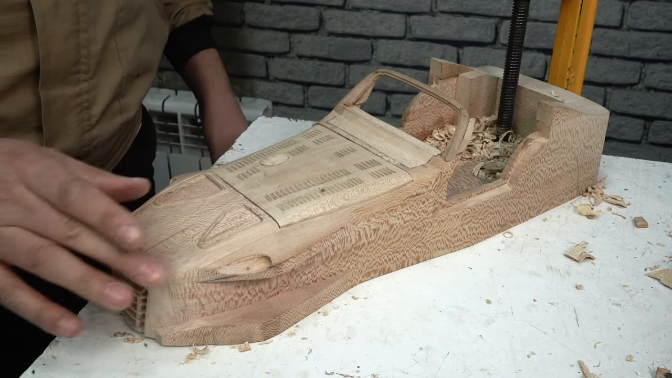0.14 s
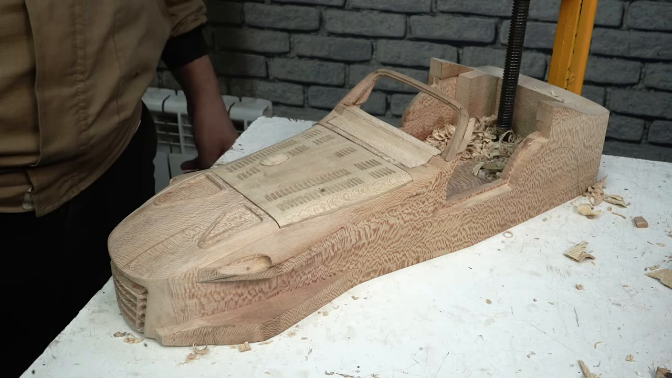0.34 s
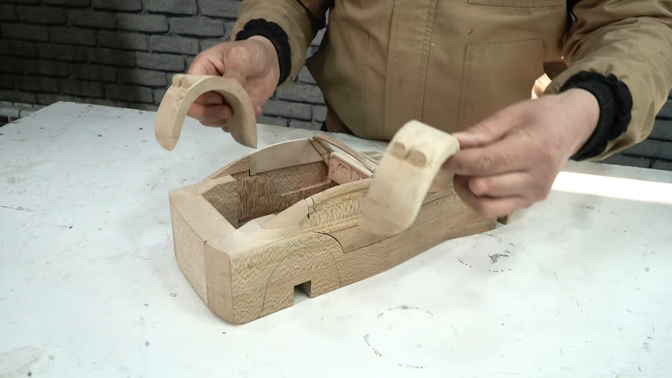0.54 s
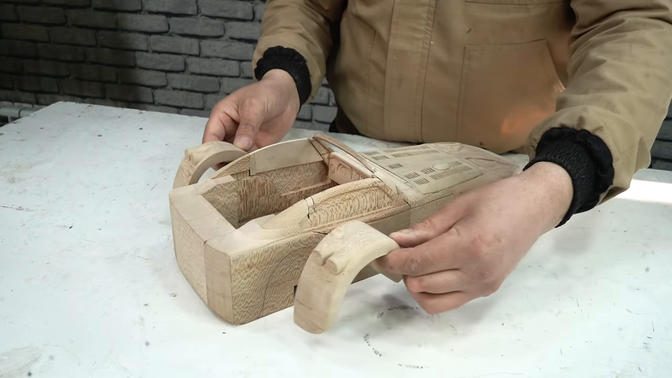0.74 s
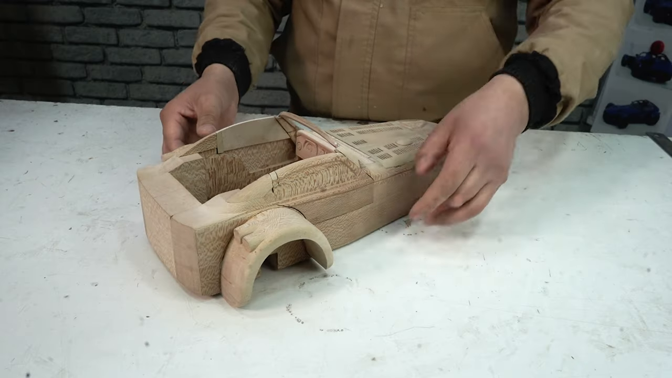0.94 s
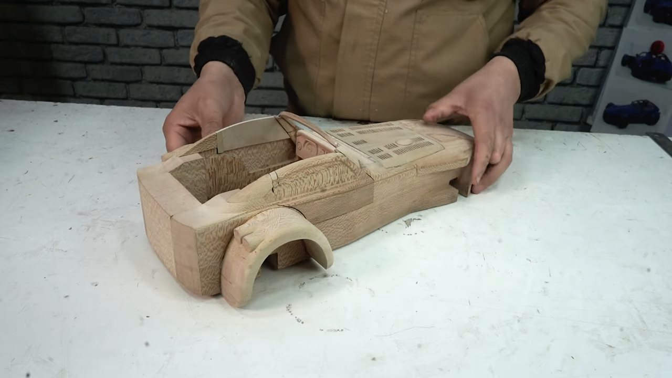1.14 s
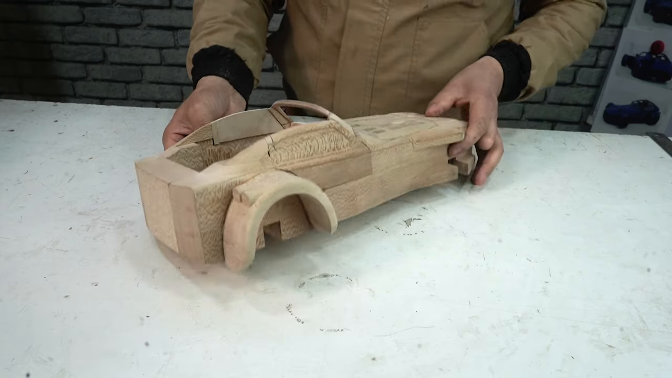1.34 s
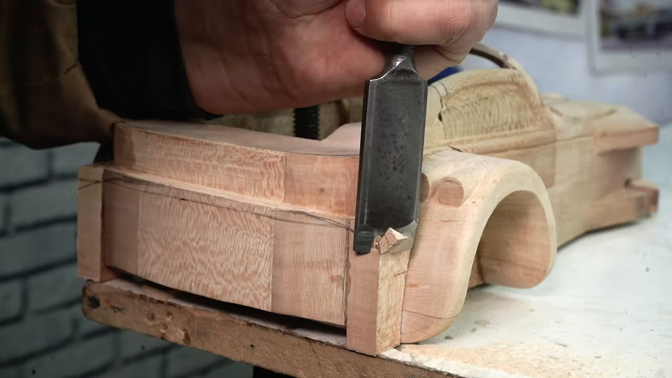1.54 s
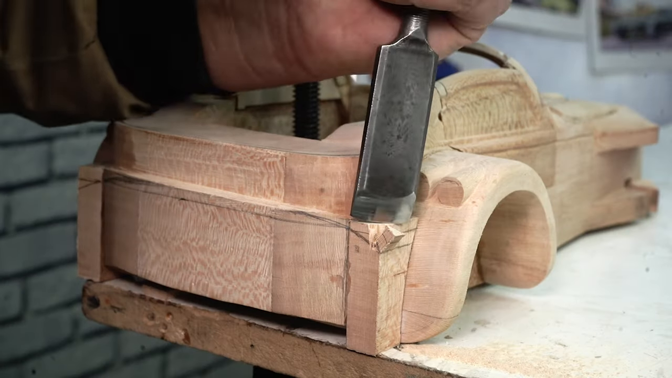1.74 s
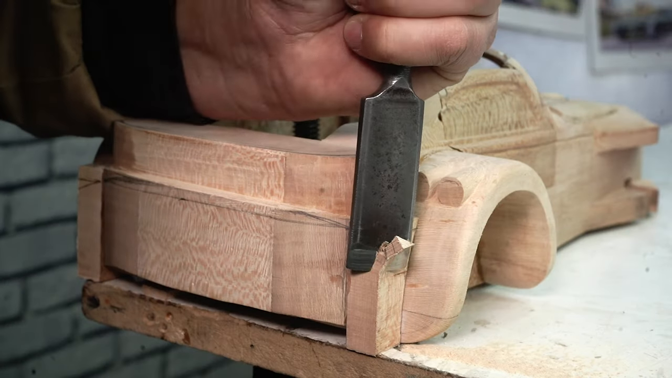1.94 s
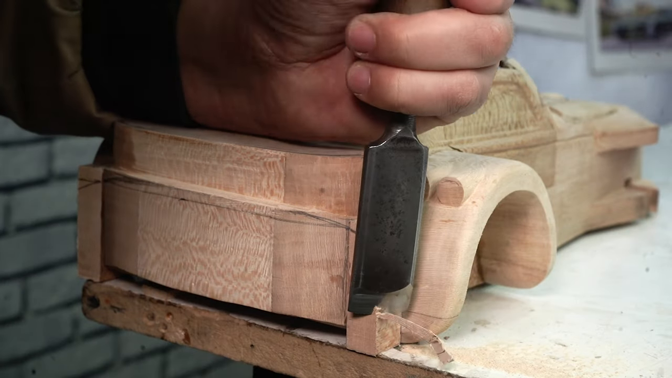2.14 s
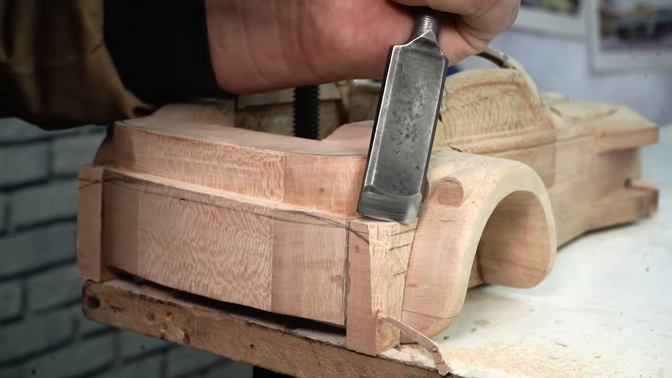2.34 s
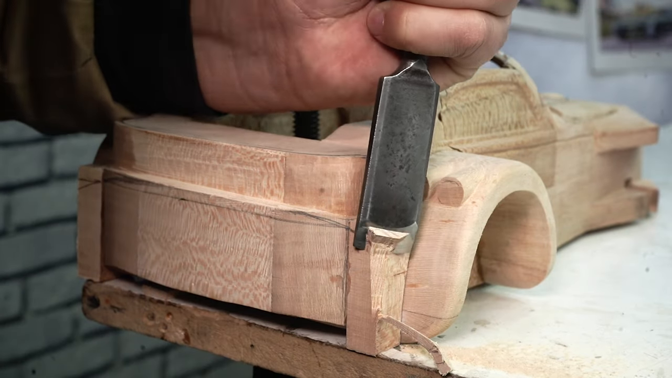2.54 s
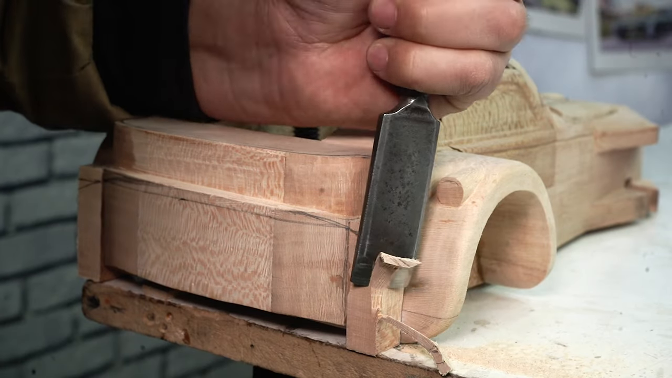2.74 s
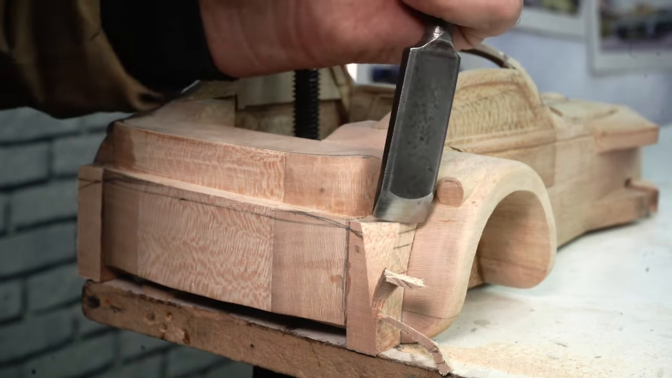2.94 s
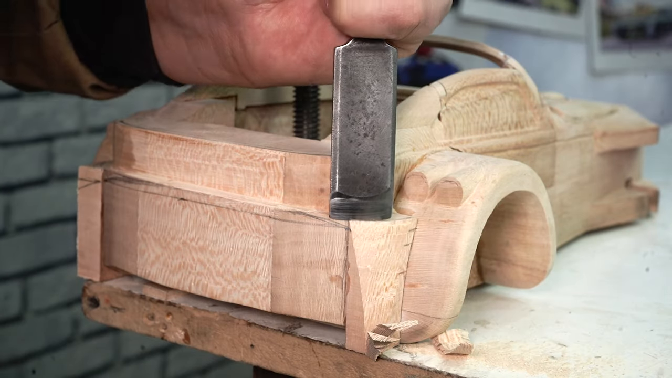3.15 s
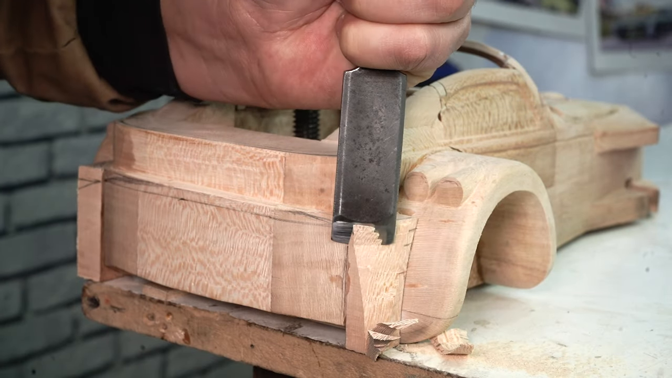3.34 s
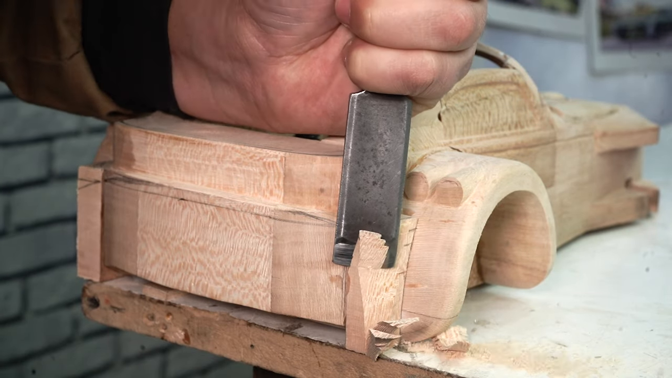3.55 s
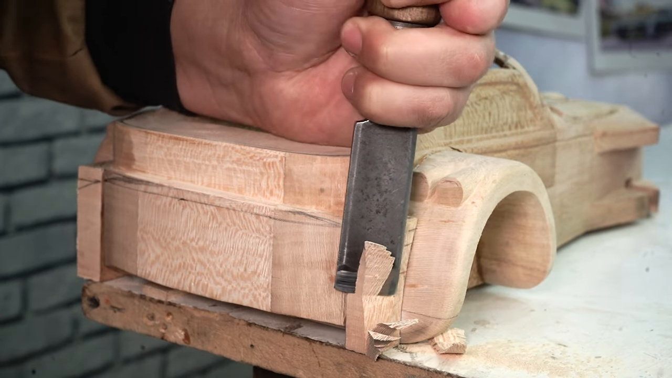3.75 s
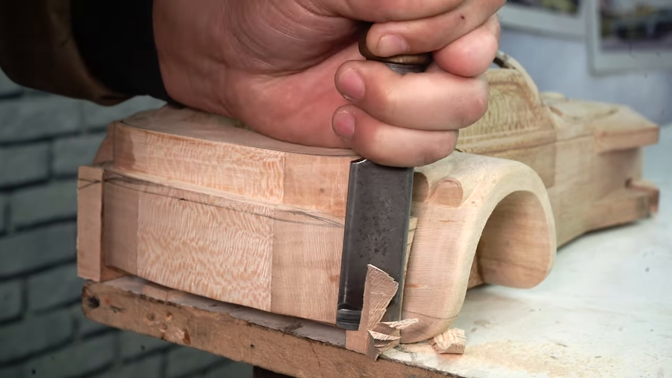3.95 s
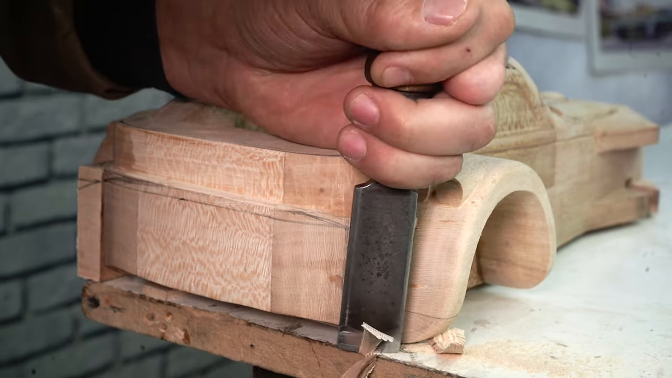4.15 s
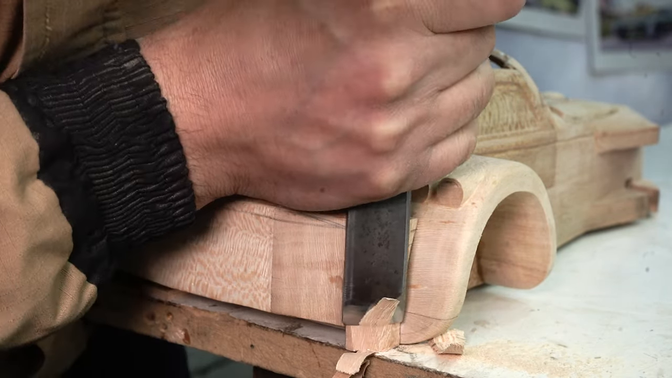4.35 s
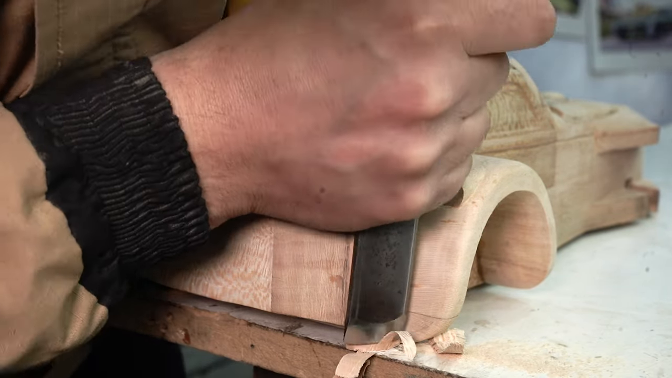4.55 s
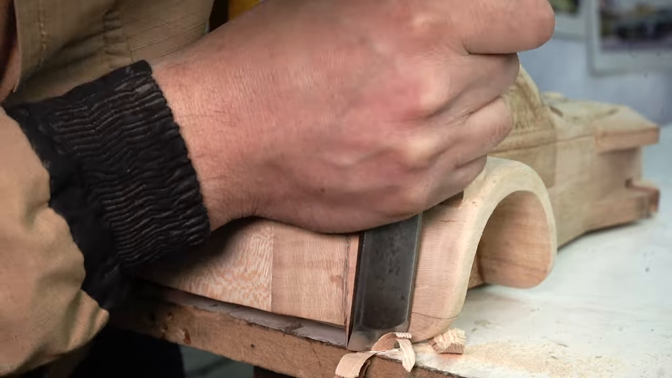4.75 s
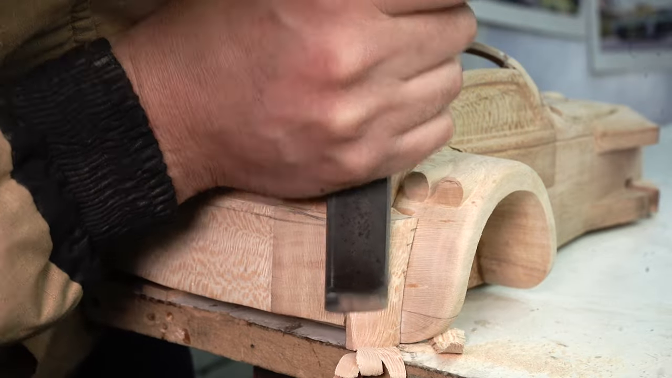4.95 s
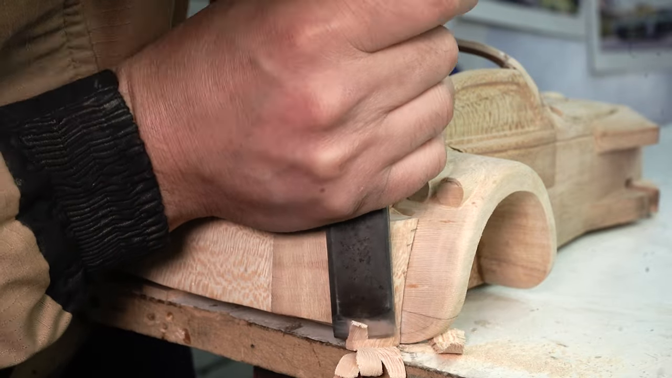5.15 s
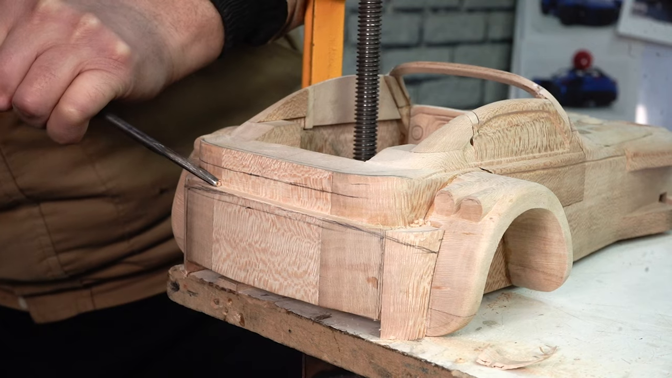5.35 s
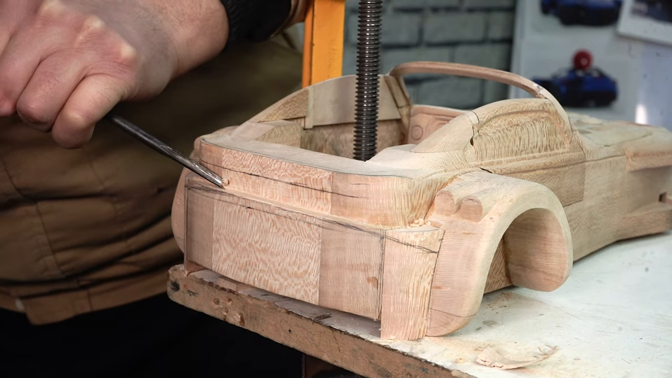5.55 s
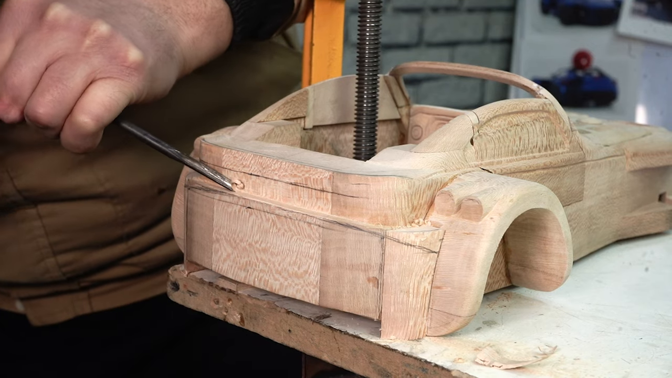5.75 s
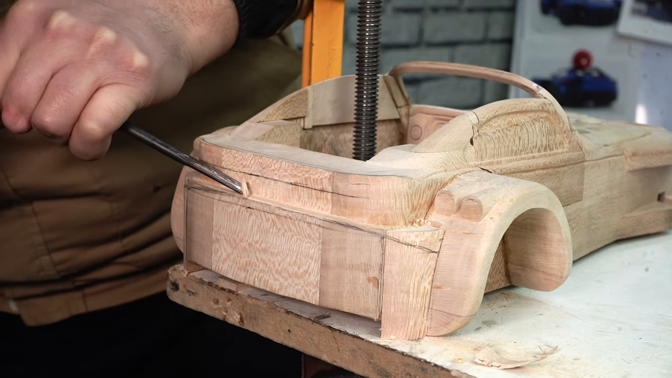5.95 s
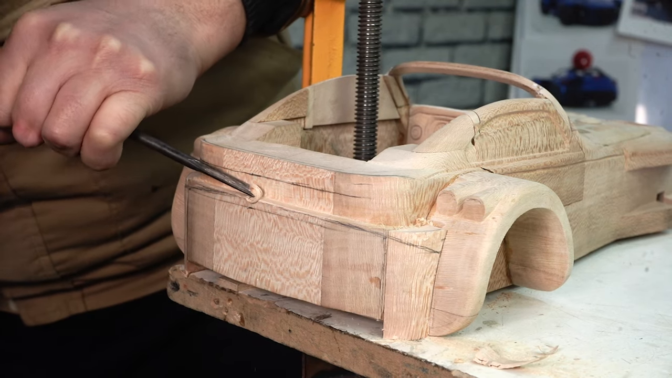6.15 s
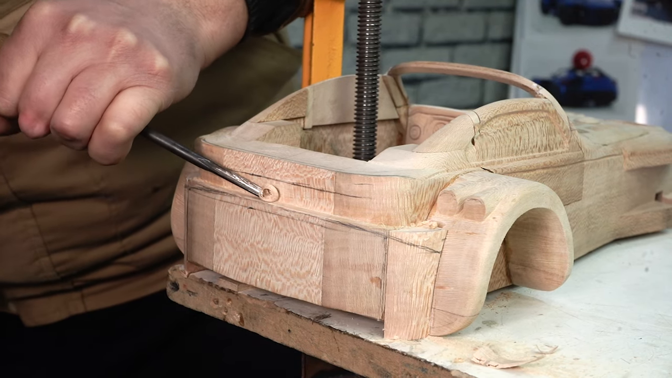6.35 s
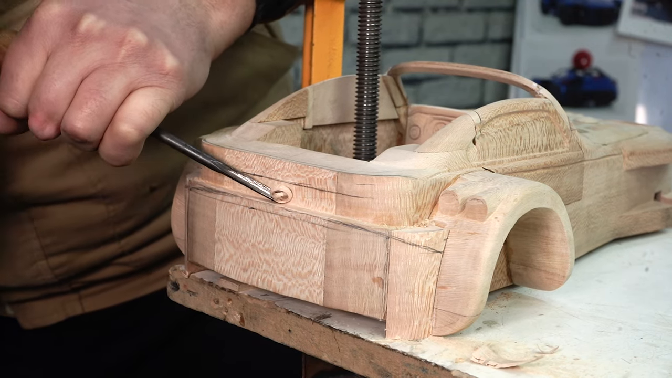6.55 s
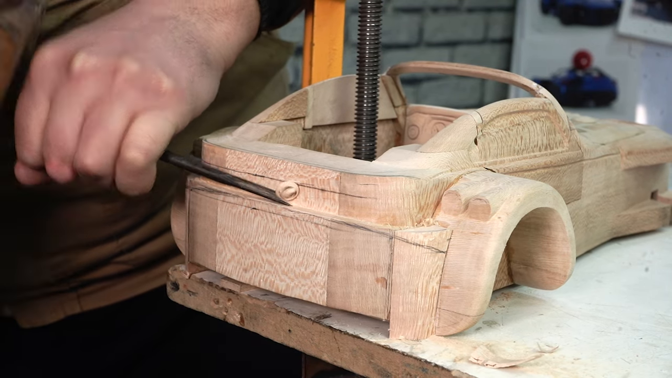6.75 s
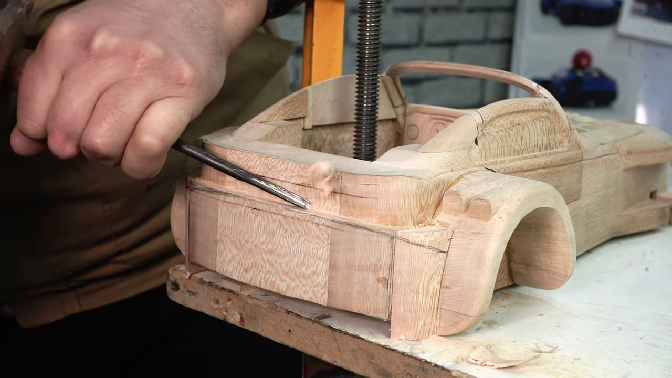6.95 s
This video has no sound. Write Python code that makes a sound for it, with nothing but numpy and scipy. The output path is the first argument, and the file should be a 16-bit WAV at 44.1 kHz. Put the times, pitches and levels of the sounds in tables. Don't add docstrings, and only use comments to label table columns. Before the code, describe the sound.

Rapid mallet taps drive a flat chisel and then a small gouge into wood, with scraping hand cuts between, close in a small workshop.

```python
import sys
import numpy as np
from scipy import signal
from scipy.io import wavfile
from scipy.ndimage import uniform_filter1d

SR = 44100
rng = np.random.default_rng(int(sys.argv[2]) if len(sys.argv) > 2 else 0)


def natural_amplitude(level_db):
    exponent = np.asarray(level_db, float) / 20
    return 10 ** exponent


def inscribe(sig):
    pcm = np.round(np.clip(np.atleast_2d(sig).T, -1, 1) * 32767)
    wavfile.write(sys.argv[1], SR, pcm.astype(np.int16))


N = 308259
T = np.arange(N) / SR
BENCH_S, CARVING_S, GOUGE_S = .5478, 1.4835, 5.292

# frequency in Hz, level in dB per Hz.
BUILDING = [(20, -7), (45, 4), (100, 9.5), (170, -35.5), (260, -52)]
# frequency in Hz, level in dB per Hz.
QUIET_SHOP = [(88, -22), (150, -32), (220, 7), (389, -17), (562, -3), (700, -41), (841, -13), (1380, -20),
              (3150, -30.5), (12000, -37.5), (15600, -92.5), (22000, -120)]
# frequency in Hz, level in dB per Hz.
IDLE_HISS = [(20, 14), (200, 0), (1000, -4), (16000, -8)]
# frequency in Hz, t60 in seconds.
ROOM_T60 = [(200, 0.16), (500, 0.69), (1000, 0.31), (2800, 0.26), (7000, 0.2), (15000, 0.13)]
# delays in seconds, then their levels in dB.
WALL_DELAYS = [0.017, 0.024]
WALL_LEVELS = [-15.5, -18.5]

# time in seconds, level in dB.
HUM_LEVELS = [
    (0.0, -36),
    (0.09, -34),
    (0.372, -33),
    (0.466, -37),
    (0.548, -44),
]
# frequency in Hz, level in dB per Hz.
WHIR_COLOUR = [(180, -43), (300, -25.5), (478, -29), (796, -5), (906, -9), (1190, -12.5), (1400, -38),
               (1940, -28.5), (4000, -67), (5200, -54), (8800, -120)]
# frequency in Hz, level in dB per Hz.
HISS_COLOUR = [(880, -30), (1500, -2), (5200, -12), (6110, -12), (12600, -13.5), (15700, -20), (16500, -38)]
# frequency in Hz, level in dB per Hz.
DRONE_COLOUR = [(76, -9), (130, -3), (303, -15.5), (330, -9), (360, -19), (612, -8), (940, -25),
                (1130, -25), (4000, -53), (5200, -70), (8800, -120)]
# frequency in Hz, level in dB per Hz.
SHAKE_COLOUR = [(15, -22), (35, 9), (60, 4), (100, -2), (160, -27), (240, -35.5)]
TICK_LEVELS = [-59, -60, -61, -59, -54]

# time in seconds, rumble in dB, air in dB.
BENCH_LEVELS = [(0.55, -52, -61), (0.78, -50, -60), (0.994, -48, -60.5), (1.196, -45, -55.5),
                (1.298, -51, -56.5), (1.48, -47, -56)]
# frequency in Hz, level in dB per Hz.
RUMBLE_COLOUR = [(12, -41), (20, -14.5), (93, -3), (225, -20), (275, -18.5), (380, -20.5), (545, -28),
                 (619, -45), (857, -39), (1500, -52), (1950, -71), (3300, -120)]
# frequency in Hz, level in dB per Hz.
AIR_COLOUR = [(290, -57), (500, -7.5), (623, -8), (859, -11), (4550, -21), (6100, -24), (15100, -24.5),
              (16500, -30)]
# start in seconds, level in dB, length in seconds.
WOOD_DRAGS = [
    (.9525, -47, 0.0125),
    (.974, -50, 0.011),
]
# time in seconds, level in dB.
CATCHES = [(.9526, -33), (.9543, -40), (.9562, -35), (.9583, -38), (.96, -38), (.9625, -41), (.9743, -34),
           (.9758, -35), (.9782, -36), (.9815, -32)]
# frequency in Hz, level in dB per Hz.
DRAG_COLOUR = [(180, -29), (300, -12), (508, -9.5), (927, -11.5), (1650, -17), (2500, -18.5), (4280, -36),
               (7800, -70)]
# frequency in Hz, width in Hz, lift in dB.
DRAG_HUMPS = [(496, 50, 6.5), (695, 37, 3), (824, 30, 3.5), (1180, 54, 3), (1380, 87, 7), (2004, 110, 12)]
# start in seconds, level in dB, length in seconds.
SLEEVE = [
    (1.125, -52.5, 0.029),
    (1.17, -54, 0.025),
    (1.252, -48.5, 0.013),
    (1.31, -62, 0.027),
]
# frequency in Hz, level in dB per Hz.
CLOTH = [(3000, -40), (6000, -15), (16000, -11.5)]
# frequency in Hz, width in Hz, level in dB.
CLOTH_HUMPS = [(6750, 500, 2), (8860, 740, 2), (10700, 500, 1), (13200, 1300, 5), (15200, 900, -5)]
# time in seconds, level in dB.
HOLLOW_KNOCKS = [
    (1.229, -25),
    (1.46, -46),
]
# frequency in Hz, level in dB, t60 in seconds.
HOLLOW_MODES = [(179.3, -11, 0.32), (214, -9, 0.36), (314, -0.5, 0.32), (520, 1, 0.052), (573, -24, 0.083),
                (679, -3, 0.036), (994, -5.5, 0.03), (1260, 11.5, 0.0071)]
# time in seconds, level in dB.
ROCKINGS = [
    (1.256, -30),
    (1.302, -42),
    (1.353, -48),
    (1.398, -45),
    (1.431, -56),
]
# frequency in Hz, level in dB, t60 in seconds.
ROCK_MODES = [(239, -12, 0.26), (318, -10.5, 0.14), (441, -0.5, 0.094), (594, -13.5, .12), (838, -20, .08)]

# start in seconds, level in dB, frequency in Hz,
# t60 in seconds.
SMALL_CONTACTS = [(1.116, -44, 850, .012), (1.843, -44, 3100, .06), (1.847, -53, 4400, .05),
                  (1.852, -54, 1070, 0.27), (3.069, -54, 2500, .08), (3.071, -58, 1070, 0.16),
                  (3.121, -61, 3130, .15), (3.08, -66, 543, 0.21), (3.216, -33, 1460, 0.035),
                  (3.219, -40, 550, 0.092), (1.712, -53, 2650, 0.027), (4.307, -40.5, 2900, .04),
                  (4.306, -40, 3200, 0.037), (4.381, -45, 1300, .035), (4.38, -41, 3100, .03),
                  (4.558, -43, 1465, .12), (6.7, -43, 5200, .05), (5.9, -47, 5000, .12),
                  (4.578, -40, 5850, .06), (3.9, -39, 3000, .08), (4.949, -33, 5300, .05),
                  (5.078, -50, 3330, .15), (5.115, -53, 2600, .12), (1.602, -27.5, 2090, .15),
                  (1.618, -28, 2700, .08), (1.782, -59, 950, .3), (5.266, -46, 248, .1),
                  (4.575, -37.5, 1520, 0.043), (4.568, -36, 3200, .05), (4.585, -33, 2850, 0.044),
                  (4.722, -40, 1030, .04), (5.4, -42, 1200, .05), (4.722, -41, 3700, .04),
                  (4.876, -51, 1900, .04), (4.9, -48, 1510, .05), (4.904, -43, 4220, .04),
                  (4.917, -42, 2980, .04), (4.949, -39.5, 870, .05), (4.972, -38, 2900, .06),
                  (5.065, -51, 1500, .04), (5.09, -53, 1500, .03), (5.11, -50, 1300, .04),
                  (5.111, -41, 3420, .04), (5.13, -45, 2720, .08), (5.15, -43, 2950, .04),
                  (5.199, -38, 3250, .04), (3.635, -53.5, 87, 0.32), (3.635, -60, 128, .3),
                  (4.691, -53, 98, 0.22)]
# start in seconds, level in dB, length in seconds.
FAINT_BRUSHES = [
    (.27, -58.5, .12),
    (4.19, -72, 0.062),
    (4.243, -66, .016),
    (4.255, -71, 0.03),
]
# frequency in Hz, level in dB per Hz.
BRUSH_COLOUR = [(5000, -30), (9000, -4), (11500, 0), (15000, -4), (16500, -20)]

# time in seconds, level in dB.
LEANING = [(4.25, -85), (4.374, -58), (4.506, -59), (4.842, -66), (4.976, -58.5), (5.152, -57.5),
           (5.306, -59), (5.4, -63)]
# frequency in Hz, level in dB per Hz.
GROAN_COLOUR = [(60, -15), (110, -11.5), (180, -10.5), (205, 1), (222, 4), (240, -11), (264, 5.5),
                (300, -22), (500, -36)]
# time in seconds, level in dB.
SLIDE_LEVELS = [
    (4.3, -77),
    (4.498, -50),
    (4.604, -74),
    (5.032, -64),
    (5.25, -61),
]
# frequency in Hz, level in dB per Hz.
SHAVING_COLOUR = [(150, -12), (250, -3), (700, -3), (1500, -4), (3000, 0.5), (6000, -3.5), (14000, -7.5),
                  (16500, -9)]
# start in seconds, level in dB, rise in seconds,
# chip ring in dB.
HAND_PRODS = [(1.842, -46, 0.0063, -6), (3.068, -55, 0.0046, -6), (3.118, -64, 0.0044, 1),
              (4.303, -35, 0.0052, 2), (4.379, -44, 0.011, -2), (4.414, -30, 0.0024, -6),
              (4.556, -38, 0.015, 1.5), (4.676, -45.5, 0.015, -1), (4.716, -36.5, 0.0063, 2.5),
              (4.895, -42, 0.01, 0), (4.935, -32, 0.0068, 0.5), (5.076, -48.5, 0.011, -5),
              (5.104, -39.5, 0.0072, -3), (5.148, -41.5, 0.0043, -3), (5.194, -35.5, 0.0074, -8)]
# frequency in Hz, width in Hz, lift in dB.
CHIP_HUMPS = [(932, 220, 7.5), (1420, 260, 10), (2860, 560, 9), (3340, 260, 7), (4360, 260, 8),
              (5900, 340, 11)]

# time in seconds, steel click in dB, wood crunch in dB, low thud in dB.
HAND_THRUSTS = [
    (4.4183, -6.5, -32.5, -44.5),
    (4.7678, -36, -34, -53.5),
    (4.9472, -8.5, -39, -54.5),
    (5.2588, -16, -39, -46.5),
]
# frequency in Hz, level in dB per Hz.
THRUST_COLOUR = [(410, -22), (700, -19), (936, -4.5), (1510, -4.5), (2810, -0.5), (13700, -16),
                 (15900, -10), (16500, -43)]
# frequency in Hz, level in dB, t60 in seconds.
THRUST_MODES = [(189, -13, 0.28), (218.5, -7.5, 0.45), (258.5, 2, 0.36), (544, 1, .11), (863, -8.5, 0.2),
                (1016, 6, 0.044)]
# frequency in Hz, level in dB, t60 in seconds.
CRACK_MODES = [(2270, -4, 0.01), (3150, -2.5, 0.022), (3880, 11, 0.0039), (5040, 4, 0.0086),
               (6120, -5, 0.023)]
# time in seconds, level in dB.
SPLINTER_SNAPS = [
    (4.419, -12),
    (4.7677, -22),
    (4.948, -16),
]
# frequency in Hz, level in dB, t60 in seconds.
SPLINTER_MODES = [(12600, -1, .003), (13900, 1, 0.0047), (15300, -4, .003)]
# frequency in Hz, level in dB, t60 in seconds.
LAY_MODES = [(257, -1, 0.021), (1260, -3, 0.029), (1370, 4, 0.023), (2130, 1, 0.016), (3060, 0, .02)]

# frequency in Hz, level in dB per Hz.
FIZZ_COLOUR = [(2500, -37), (5000, 2), (8000, 2), (12000, -2), (16000, -9)]
# time in seconds, bite in dB.
SHORT_CUT_BLOWS = [(1.5057, -28), (1.5543, -25), (1.894, -25.5), (1.946, -25.5), (1.9917, -25),
                   (2.0378, -25.5), (2.0851, -26), (2.128, -27), (2.1729, -29), (2.2154, -30.5),
                   (2.4652, -26), (2.5299, -25.5), (2.582, -25.5), (2.6329, -26), (2.6835, -26.5),
                   (2.7323, -26.5), (2.7814, -28), (2.8291, -29), (2.8795, -30.5)]
# time in seconds, bite in dB.
LONG_CUT_BLOWS = [(3.2143, -31.5), (3.2702, -29.5), (3.3218, -27.5), (3.3758, -25), (3.4335, -25),
                  (3.491, -25.5), (3.5465, -25), (3.6014, -25), (3.6565, -26), (3.7125, -27), (3.7679, -28),
                  (3.8252, -28.5), (3.8791, -28.5), (3.9341, -29), (3.987, -29), (4.0369, -30),
                  (4.0864, -32), (4.1276, -32), (4.1668, -34.5)]
# time in seconds, steel click in dB, wood crunch in dB,
# low thud in dB.
GLANCING = [
    (1.4834, -38, -32.5, -49),
    (1.5982, -32, -25, -32.5),
    (1.8427, -31, -47.5, -62),
    (3.0682, -51.5, -55.5, -69),
]
# frequency in Hz, level in dB, t60 in seconds.
CHISEL_PING = [(3970, -4, 0.007), (5060, -6, 0.0053), (7550, -7, 0.0056), (9780, -5, 0.011),
               (11500, -12, 0.0063), (13300, -7.5, 0.0061), (14730, -7, .004)]
# frequency in Hz, level in dB, t60 in seconds.
SHORT_GRIP_MODES = [(5730, 2.5, 0.0083), (8300, -1, 0.0092), (9050, -5, .008)]
# frequency in Hz, level in dB, t60 in seconds.
LONG_GRIP_MODES = [(3320, -2.5, 0.012), (6420, -1, 0.009), (8400, -9.5, 0.027), (10660, -2, .006),
                   (12300, 0, .004), (13200, 1, .004), (15400, -3.5, .004)]
# frequency in Hz, level in dB, t60 in seconds.
SWELL_MODES = [(1696, -4.5, 0.037), (2130, -3, 0.13), (2520, 2, 0.062), (2710, 6.5, 0.092)]
# frequency in Hz, level in dB per Hz.
CHISEL_CRUNCH = [(590, -13.5), (1000, -10), (1510, -8.5), (1640, -8), (1880, -7), (2770, -2.5), (3190, -5),
                 (8460, -12.5), (15200, -25.5), (16500, -11.5)]
# frequency in Hz, width in Hz, lift in dB.
CHISEL_HUMPS = [(1664, 34, 6), (2080, 65, 4), (2129, 54, 3), (2450, 16, 5.5), (2710, 23, 4), (2750, 34, 0),
                (3120, 40, 0), (3440, 63, -2), (5850, 80, 2.5), (8400, 90, 5), (7200, 900, -3),
                (10600, 90, 3.5)]
# frequency in Hz, level in dB, t60 in seconds.
CHISEL_THUD = [(264.5, -6.5, 0.39), (319.6, -9.5, 0.23), (569.5, 3, 0.092), (843, 5.5, 0.06),
               (973, -3.5, 0.11), (1314, -20, 0.099)]

# time in seconds, steel click in dB, bite in dB.
GOUGE_CUT = [(5.3039, -24, -31.5), (5.3509, -21, -33.5), (5.402, -22.5, -36), (5.4528, -20.5, -35.5),
             (5.5001, -22.5, -35), (5.5492, -20.5, -33), (5.598, -21, -32.5), (5.649, -23.5, -29.5),
             (5.6971, -21, -30.5), (5.7482, -21.5, -33), (5.799, -22.5, -34.5), (5.8461, -21, -33),
             (5.8948, -21, -33.5), (5.9433, -21.5, -30.5), (5.9898, -20, -32), (6.038, -21.5, -31),
             (6.0866, -22, -29), (6.1345, -21, -29), (6.1833, -21.5, -30.5), (6.2327, -23, -30),
             (6.2803, -23, -28.5), (6.3273, -23, -31.5), (6.3749, -21, -34), (6.4222, -20.5, -32.5),
             (6.4696, -21, -30.5), (6.5175, -20.5, -31.5), (6.5659, -21.5, -28.5), (6.6124, -21.5, -27.5),
             (6.6611, -22.5, -27), (6.7077, -22.5, -28), (6.756, -22.5, -28), (6.8069, -26, -30),
             (6.8573, -27, -30), (6.903, -25, -28.5), (6.9505, -24.5, -33.5)]
# frequency in Hz, level in dB, t60 in seconds.
GOUGE_PING = [(2443, -11.5, 0.02), (4300, -2.5, 0.0058), (4580, -6, 0.0098), (5090, -1, 0.0068),
              (5470, 3.5, 0.0068), (7980, -5.5, .012), (8300, -8.5, .01), (9180, -8.5, 0.015),
              (10470, -13, 0.017), (11300, -8.5, 0.007), (12900, -12, .006), (15100, -16.5, 0.0075)]
# frequency in Hz, level in dB, t60 in seconds.
SHANK_MODES = [(5787, 2, 0.013), (5680, -8, 0.008)]
# frequency in Hz, level in dB per Hz.
GOUGE_CRUNCH = [(420, -7), (700, -1.5), (1300, 1.5), (1800, 0.5), (2500, 2), (4000, 0), (6000, -0.5),
                (9000, -2.5), (14800, -11.5), (16500, -22)]
# frequency in Hz, width in Hz, lift in dB.
GOUGE_HUMPS = [(850, 52, 3.5), (980, 40, 6.5), (1090, 60, 3.5), (1205, 60, 3.5), (1550, 240, 1.5),
               (2610, 420, 1.5), (3540, 230, 2.5), (6000, 180, 1.5), (6950, 1060, -3.5)]
# frequency in Hz, level in dB, t60 in seconds.
GOUGE_THUD = [(265.1, -13, 0.37), (345, -7.5, 0.07), (550, 3.5, 0.035), (973, -1.5, 0.077),
              (1085, -3.5, 0.066)]
# frequency in Hz, level in dB, t60 in seconds.
BOOM_MODES = [(875, -1, 0.034), (850, -6, 0.21)]
# frequency in Hz, level in dB, t60 in seconds.
GROOVE_MODES = [(1081.5, -4, 0.053), (1150, -9, 0.13), (1200, 0, 0.034)]


def evened(x):
    return x / np.sqrt(np.mean(x ** 2) + 1e-20)


def read(points, hz):
    f, value = np.transpose(points)
    return np.interp(np.log(hz + 1), np.log(f + 1), value)


def curve_db(rows, column):
    return np.interp(T, [r[0] for r in rows], [r[column] for r in rows])


def colour(spectrum, humps=(), size=4096):
    hz = abs(np.fft.fftfreq(size, 1 / SR))
    level_db = read(spectrum, hz) + sum(db / (1 + (2 * (hz - f) / w) ** 2) for f, w, db in humps)
    log_gain = np.log(natural_amplitude(np.maximum(level_db - level_db.max(), -100)))
    response = np.exp(log_gain - 1j * signal.hilbert(log_gain).imag)
    taps = np.fft.ifft(response).real[:size // 2]
    return taps / np.linalg.norm(taps)


def through(x, taps):
    return signal.oaconvolve(x, taps)[:N]


def noise(spectrum):
    return through(rng.standard_normal(N), colour(spectrum))


def ring(modes, rise_s, size=SR // 3):
    t = np.arange(size) / SR
    x = sum(natural_amplitude(db - 60 * t / max(t60, .002)) * np.sin(2 * np.pi * hz * t) for hz, db, t60 in modes)
    x = x * (1 - np.exp(-t / rise_s))
    return x / abs(x).max()


def train(times, levels_db):
    x = np.zeros(N)
    x[np.round(np.asarray(times) * SR).astype(int)] = natural_amplitude(np.asarray(levels_db))
    return x


def struck(rows, modes, rise_s, **size):
    return through(train(*np.transpose(rows)), ring(modes, rise_s, **size))


def bursts(rows):
    shape = np.zeros(N)
    for s, db, length in rows:
        shape += natural_amplitude(db) * np.clip(np.minimum(T - s, s + length - T) / 0.0017, 0, 1)
    return shape * rng.standard_normal(N)


def room(x, count=3, turns=0.4066):
    out = np.zeros(N)
    for k in range(count):
        hz, t, z = signal.stft(rng.standard_normal(SR // 2), SR, nperseg=128)
        tail = signal.istft(z * natural_amplitude(-60 * t / read(ROOM_T60, hz)[:, None]), SR, nperseg=128)[1]
        tail *= 1 - np.exp(-np.arange(len(tail)) / SR / 0.0085)
        share = np.sqrt(2 / count) * np.cos(2 * np.pi * (turns * T + k / count / 2))
        out += through(x * share, tail / np.linalg.norm(tail))
    return out


def quiet_shop():
    return 2 * natural_amplitude(-67.5) * noise(QUIET_SHOP) + natural_amplitude(-70) * noise(BUILDING)


def machine():
    hum_hz, tick_hz, tick_gap_s = 99.7, 6200, 0.057
    tone = np.sin(2 * np.pi * hum_hz * T + 1.2) + natural_amplitude(-26.5) * np.sin(4 * np.pi * hum_hz * T)
    hum = np.sqrt(2) * natural_amplitude(curve_db(HUM_LEVELS, 1)) * tone
    first_echo_db = np.exp(-T / .03)
    whir = natural_amplitude(-30.5 - 87 * T + first_echo_db) * noise(WHIR_COLOUR)
    hiss = (natural_amplitude(-45 - 162 * T) + natural_amplitude(-65.5)) * noise(HISS_COLOUR)
    beat = train(0.16 + tick_gap_s * np.arange(len(TICK_LEVELS)), TICK_LEVELS)
    ticks = through(beat, ring([(tick_hz, 0, .03), (tick_hz * 0.58, -6, .015)], .001))
    drone = natural_amplitude(-54) * noise(DRONE_COLOUR)
    return 2 * (hum + whir + hiss + ticks + drone) + natural_amplitude(-47.5) * noise(SHAKE_COLOUR)


def bench():
    rumble = natural_amplitude(curve_db(BENCH_LEVELS, 1)) * noise(RUMBLE_COLOUR)
    air = natural_amplitude(curve_db(BENCH_LEVELS, 2)) * noise(AIR_COLOUR)
    catches = 4 * train(*np.transpose(CATCHES))
    drags = through(bursts(WOOD_DRAGS) - catches, colour(DRAG_COLOUR, DRAG_HUMPS))
    cloth = colour(CLOTH, [(f, w, db + 18) for f, w, db in CLOTH_HUMPS])
    rustles = through(bursts(SLEEVE), cloth)
    knocks = struck(HOLLOW_KNOCKS, HOLLOW_MODES, 0.0023) + struck(ROCKINGS, ROCK_MODES, 0.0056)
    return rumble + air + drags + rustles + knocks + natural_amplitude(-9.5) * room(knocks, count=2)


def contacts():
    out = np.zeros(N)
    for s, db, hz, t60 in SMALL_CONTACTS:
        sound = natural_amplitude(db) * ring([(hz, 0, t60)], 4 / hz, size=round(t60 * SR))
        out[round(s * SR):][:len(sound)] += sound
    return out + through(bursts(FAINT_BRUSHES), colour(BRUSH_COLOUR))


def groan():
    leaning = (T > LEANING[0][0]) * (T < LEANING[-1][0])
    return 2 * natural_amplitude(curve_db(LEANING, 1)) * leaning * noise(GROAN_COLOUR)


def paring():
    slips = natural_amplitude(0.91 * evened(uniform_filter1d(rng.standard_normal(N), 300)))
    sliding = (T > SLIDE_LEVELS[0][0]) * (T < SLIDE_LEVELS[-1][0])
    stroke = natural_amplitude(curve_db(SLIDE_LEVELS, 1)) * sliding
    uneven = evened(slips * rng.standard_normal(N))
    slide = 2 * through(stroke * uneven, colour(SHAVING_COLOUR, CHISEL_HUMPS))
    prods = np.zeros(N)
    sizes = 1 + .02 * rng.standard_normal((len(HAND_PRODS), len(CHIP_HUMPS)))
    for (s, db, rise, chip_db), size in zip(HAND_PRODS, sizes):
        u = np.arange(SR // 8) / SR / max(rise, .001)
        scrape = natural_amplitude(db) * u * np.exp(1 - u) * rng.standard_normal(len(u))
        humps = [(f * k, w, max(lift + chip_db, 0)) for (f, w, lift), k in zip(CHIP_HUMPS, size)]
        sound = signal.oaconvolve(scrape, colour(SHAVING_COLOUR, humps))
        prods[round(s * SR):][:len(sound)] += sound
    return slide + prods + natural_amplitude(-4) * room(prods, count=2)


def pings(times, levels_db, steel, sag, rise_s, size=1024):
    out = np.zeros(N + 2048)
    chance = rng.standard_normal((len(times), 2, len(steel)))
    for s, level_db, (detune, lift) in zip(times, levels_db, chance):
        pitch = (1 - sag * (s - times.mean())) * (1 + .004 * detune)
        modes = [(hz * p, db + 1.2 * u, t60) for (hz, db, t60), p, u in zip(steel, pitch, lift)]
        out[round(s * SR):][:size] += natural_amplitude(level_db) * ring(modes, rise_s, size=size)
    return out[:N]


def grit():
    snaps_db = 2.1 * np.minimum(rng.exponential(1, N), 5)
    return evened(natural_amplitude(snaps_db) * rng.standard_normal(N))


def blows(rows, steel, wood, humps, body, sag, rise_s, spike_db, snap_db, fizz_db, build_s, hold_s,
          fade_db, click_db, crunch_db, thud_db, loose_db, wet_db, thud_rise_s, boom_db):
    s, click, crunch, thud = np.transpose(rows)
    s = s + .0008
    ping = -pings(s, click + click_db, steel, sag, rise_s)
    first_instant = signal.lfilter([.5, 1, .1, -.9, -.5], 1, train(s, click + spike_db))
    ping = ping - first_instant
    snap = -through(train(s, crunch + snap_db), colour(wood)[:400] * 2)
    t = np.arange(SR // 16) / SR
    bite = (1 - np.exp(-t / build_s)) * natural_amplitude(-fade_db * t / hold_s) / (1 + np.exp((t - hold_s) / 0.00098))
    push, rough = train(s, crunch + crunch_db), grit()
    shudder = through(push, bite * rng.standard_normal(len(t)))
    firmness = np.clip((crunch + 29) / 6, 0, 1)
    firm = push * np.interp(T, *np.array(sorted(zip(s, firmness))).T)
    held = bite * (natural_amplitude(0.89 * fade_db * t / hold_s) - 1)
    tearing = through(push, bite) + through(firm, held)
    fibres = natural_amplitude(loose_db) * tearing * rough
    sharp = through(train(s, click + fizz_db), bite)
    fizz = through(sharp * rough[::-1], colour(FIZZ_COLOUR))
    wooden = snap + through(shudder + fibres, colour(wood, humps)) + fizz
    knock = through(train(s, thud + thud_db), ring(body, thud_rise_s))
    beamed = natural_amplitude(-9) * ping
    walls = through(ping + snap, train(WALL_DELAYS, WALL_LEVELS)[:SR // 20])
    return ping + walls + wooden + knock + natural_amplitude(wet_db) * room(wooden + beamed + natural_amplitude(boom_db) * knock)


def thrusts():
    pushes = blows(HAND_THRUSTS, CHISEL_PING, THRUST_COLOUR, CHISEL_HUMPS, THRUST_MODES,
                   sag=0, rise_s=0.00025, spike_db=-11.5, snap_db=8, fizz_db=-20.5, build_s=0.0004,
                   hold_s=0.047, fade_db=12, click_db=-16, crunch_db=4.5, thud_db=13, loose_db=0,
                   wet_db=-8, thud_rise_s=0.003, boom_db=3.5)
    crack = struck([(4.768, -11.5)], CRACK_MODES, 0.00024)
    splinters = struck(SPLINTER_SNAPS, SPLINTER_MODES, .0001, size=512)
    return pushes + crack + splinters + struck([(5.2605, -21)], LAY_MODES, 0.0014)


def gouge_blows():
    s, click, bite = np.transpose(GOUGE_CUT)
    deepening_db = 8.5 * np.minimum(s - 6.1, 0)
    thud = -37 + 0.84 * (bite + 31) + deepening_db
    return np.transpose([s, click + 4.1, bite, thud + .8 * rng.standard_normal(len(s))])


def gouge():
    taps = gouge_blows()
    s, click, _, thud = taps.T
    cut = blows(taps, GOUGE_PING, GOUGE_CRUNCH, GOUGE_HUMPS, GOUGE_THUD,
                sag=0.011, rise_s=0.00039, spike_db=-22, snap_db=-15, fizz_db=-20.5, build_s=0.0013,
                hold_s=0.028, fade_db=19, click_db=3, crunch_db=-0.5, thud_db=4, loose_db=2,
                wet_db=-4, thud_rise_s=0.003, boom_db=-2)
    groove = through(train(s, -41 - 7.5 * (s - GOUGE_S)), ring(GROOVE_MODES, 0.012))
    boom = through(train(s + 0.00597, thud + 4.5), ring(BOOM_MODES, 0.0027))
    shank_db = click - 1.5 - 8 * (s - GOUGE_S)
    shank = pings(s + 0.0008, shank_db, SHANK_MODES, 0.024, 0.00078)
    return cut + boom + groove + natural_amplitude(2.5) * room(groove, count=2) - shank


def chisel_blows():
    s, bite = np.transpose(SHORT_CUT_BLOWS + LONG_CUT_BLOWS)
    luck = .8 * rng.standard_normal((2, len(s)))
    click = -14.5 - np.maximum(-26.5 - bite, 0) + luck[0]
    thud = -38 + 1.76 * (bite + 25) + 2 * luck[1]
    return np.vstack([np.transpose([s, click, bite, thud]), GLANCING])


def chisel():
    cuts = chisel_blows()
    cut = blows(cuts, CHISEL_PING, CHISEL_CRUNCH, CHISEL_HUMPS, CHISEL_THUD,
                sag=0, rise_s=0.0001, spike_db=1, snap_db=0.5, fizz_db=-11.5, build_s=0.0024,
                hold_s=0.041, fade_db=22, click_db=-2, crunch_db=-3.5, thud_db=9.5, loose_db=7.5,
                wet_db=-7.5, thud_rise_s=0.004, boom_db=-5)
    swell = pings(cuts[:, 0] + .012, cuts[:, 2] - 3.5, SWELL_MODES, 0, 0.0096, size=2048)
    short, long = np.split(cuts[:-len(GLANCING)], [len(SHORT_CUT_BLOWS)])
    short_grip = pings(short[:, 0] + .0009, short[:, 1] - 1.5, SHORT_GRIP_MODES, 0, .0002)
    long_grip = pings(long[:, 0] + .0009, long[:, 1] - 2, LONG_GRIP_MODES, 0, .0002)
    return cut + swell - short_grip - long_grip


def carving():
    before = np.clip((GOUGE_S - T) / 0.0086 + .5, .4, 1)
    low_cut = signal.butter(3, 190, "high", fs=SR, output="sos")
    tools = signal.sosfilt(low_cut, chisel() + gouge() + before * (thrusts() + paring()))
    return tools + before * groan() + quiet_shop()


def scene():
    first, last = T < BENCH_S, T >= CARVING_S
    middle = bench() * ~first * ~last
    idle = first * natural_amplitude(-76.5) * noise(IDLE_HISS)
    join_click = train([BENCH_S], [-30])
    right = machine() * first + middle + carving() * last + contacts() + join_click
    return np.array([idle + middle, right])


def band_limit(x):
    return signal.sosfilt(signal.butter(12, 16990, fs=SR, output="sos"), x)


def record(dry):
    low, full = (signal.oaconvolve(dry, signal.firwin(255, hz, window=("kaiser", 8), fs=SR)[None], "same")
                 for hz in (15800, 16900))
    power = np.gradient(np.gradient(full[1])) ** 2
    attack = uniform_filter1d(power, 128) > 4 * uniform_filter1d(power, 2048)
    opened = uniform_filter1d(attack * 1., 128)
    mix = low + opened * (full - low)
    return band_limit(mix)


dry = scene()
out = record(dry)
inscribe(out)
```